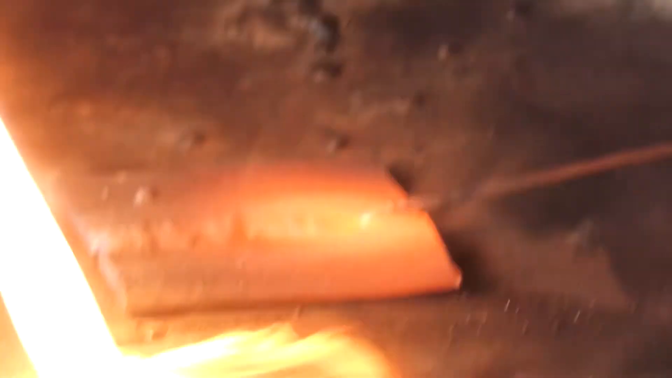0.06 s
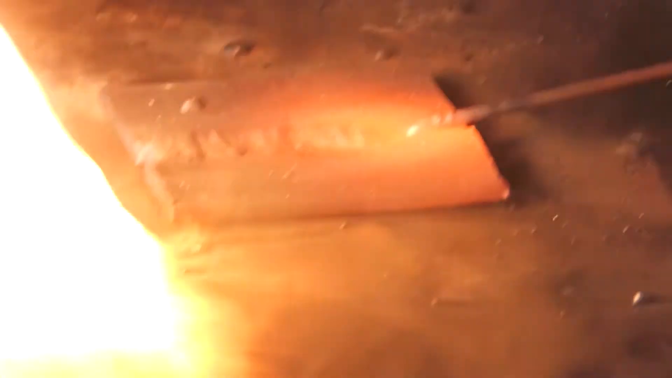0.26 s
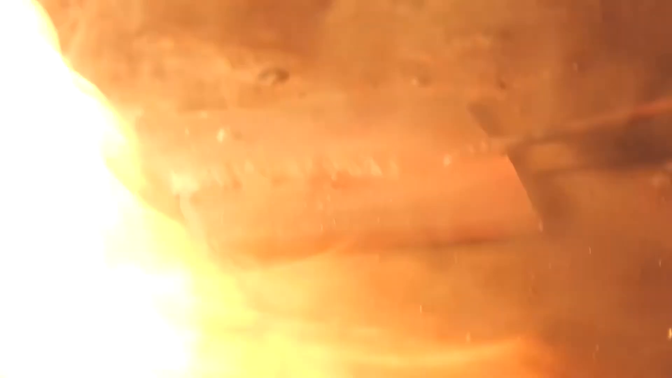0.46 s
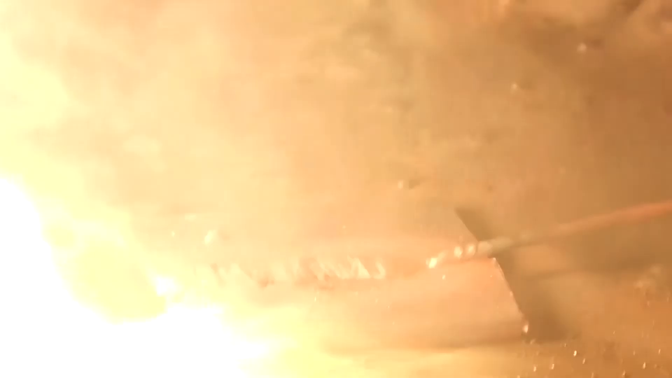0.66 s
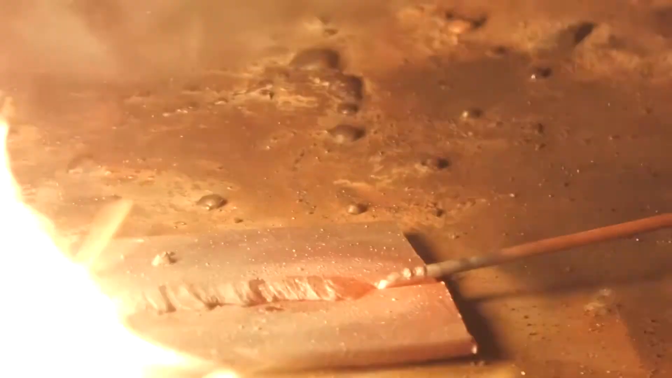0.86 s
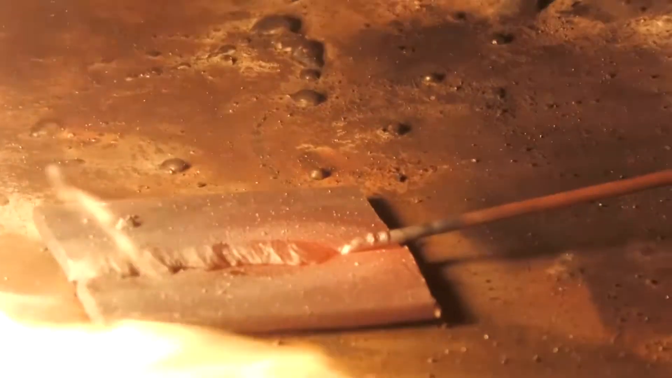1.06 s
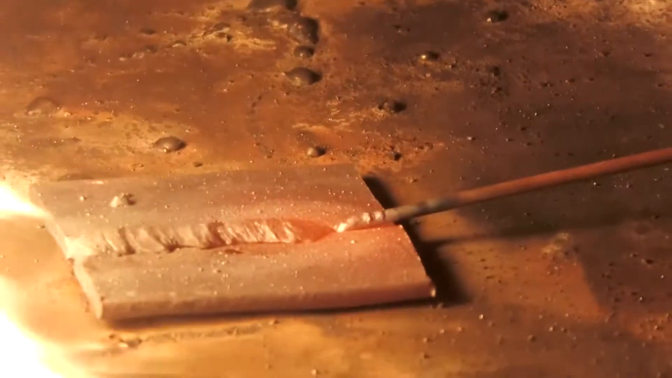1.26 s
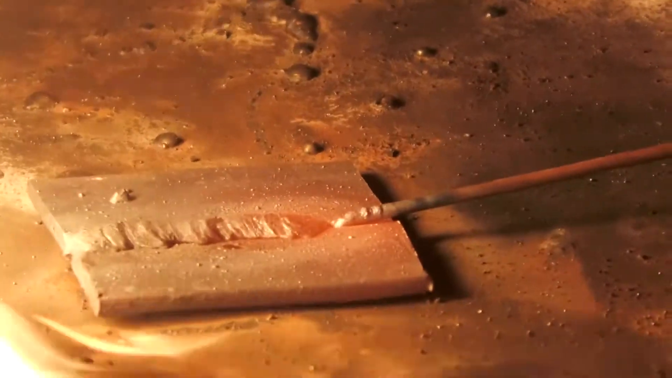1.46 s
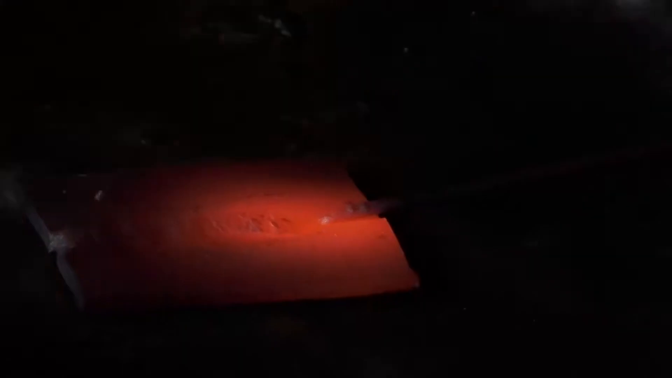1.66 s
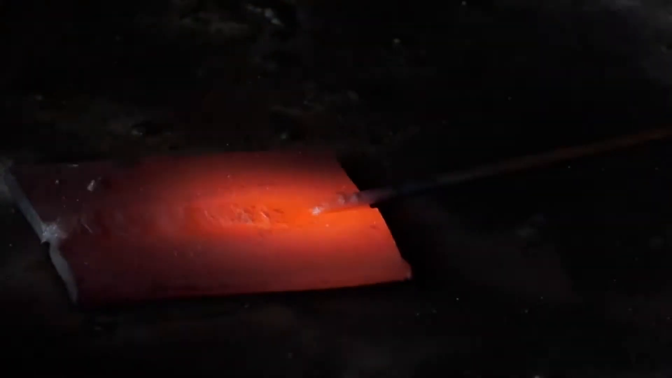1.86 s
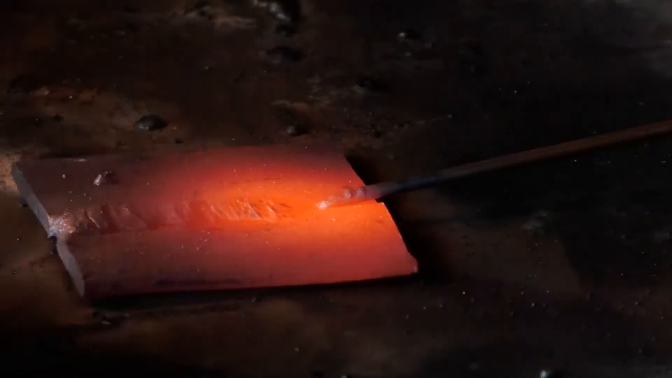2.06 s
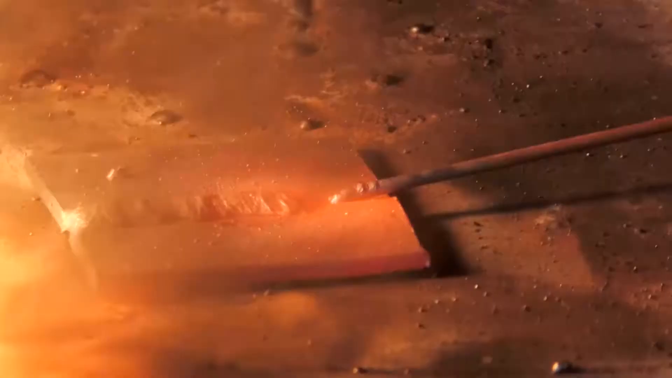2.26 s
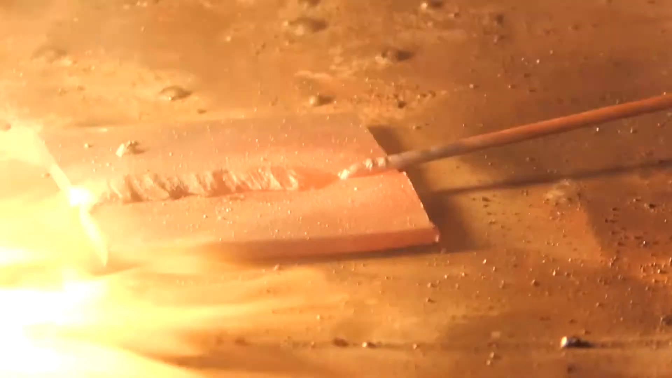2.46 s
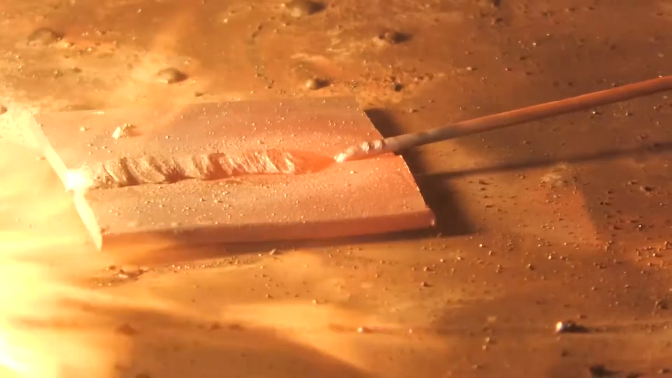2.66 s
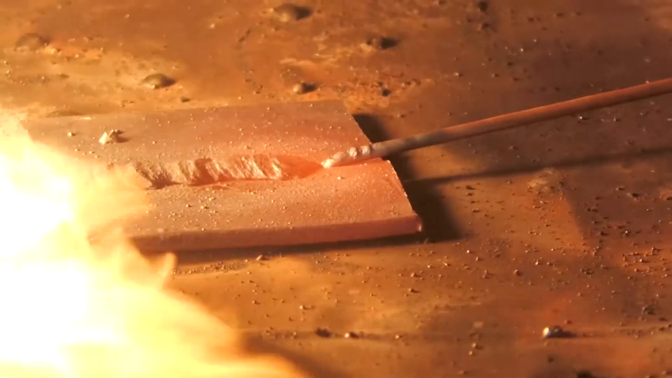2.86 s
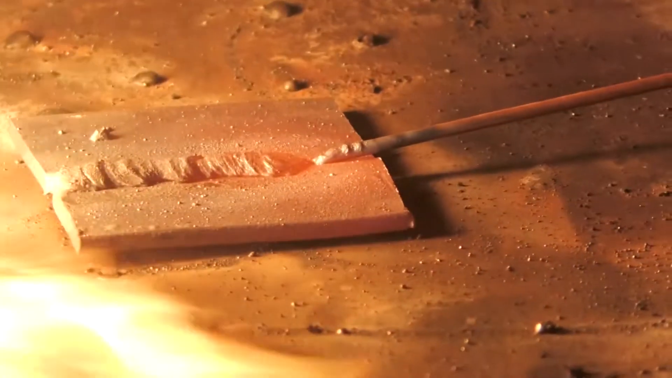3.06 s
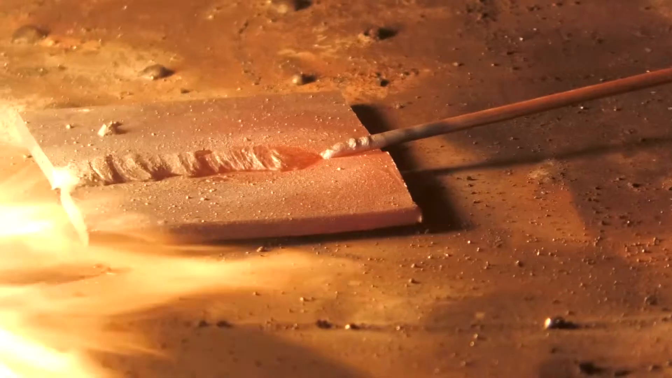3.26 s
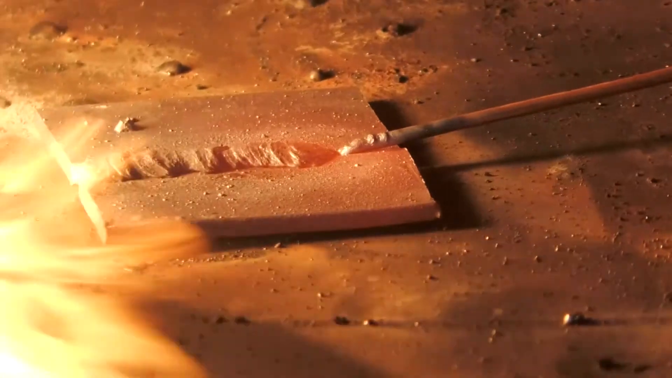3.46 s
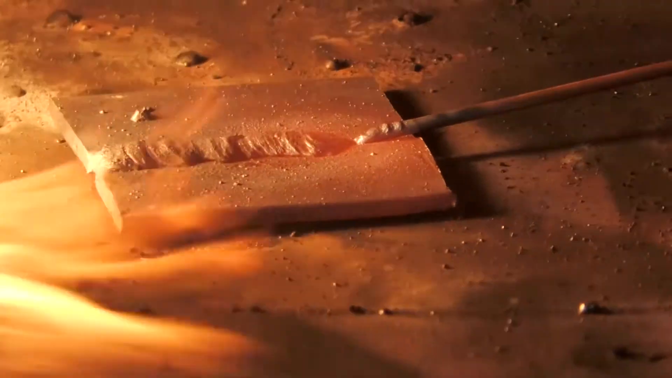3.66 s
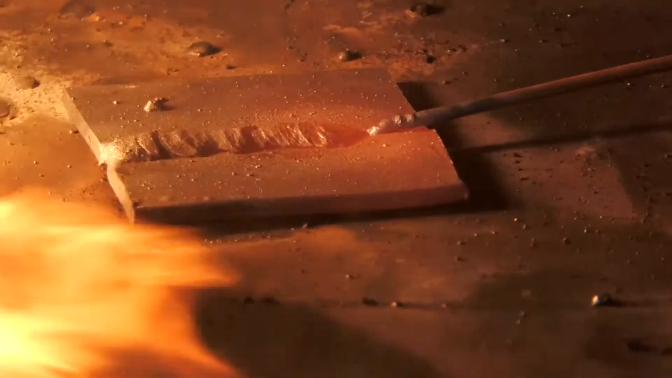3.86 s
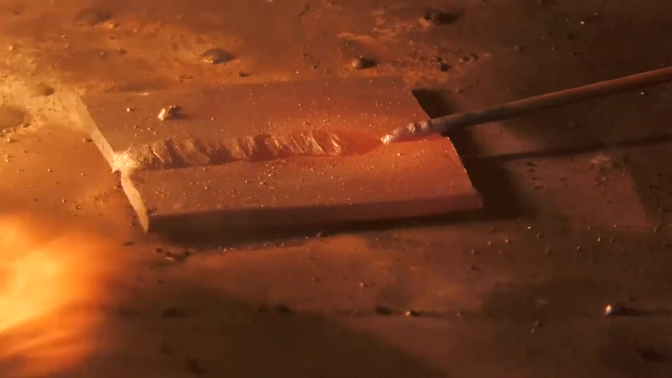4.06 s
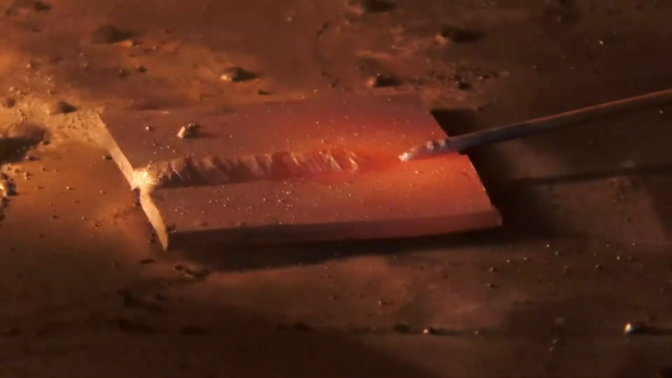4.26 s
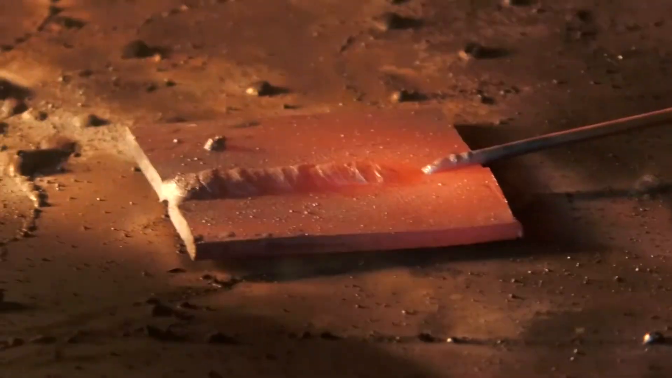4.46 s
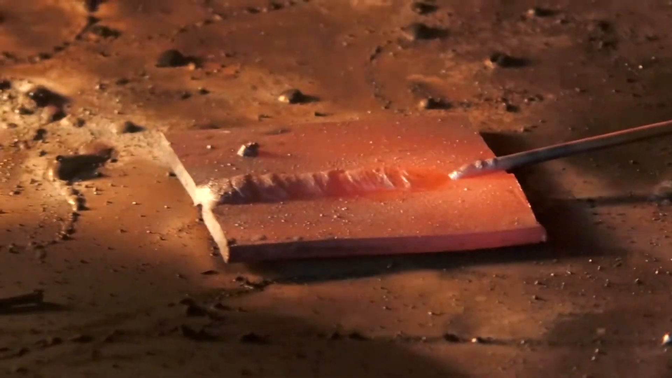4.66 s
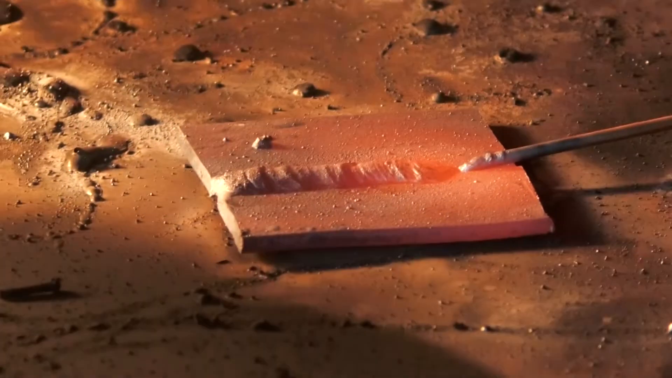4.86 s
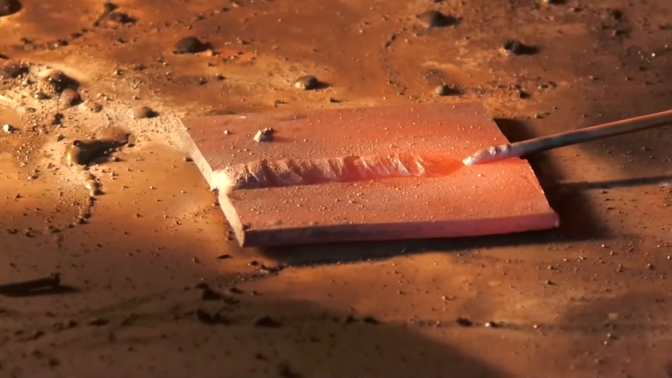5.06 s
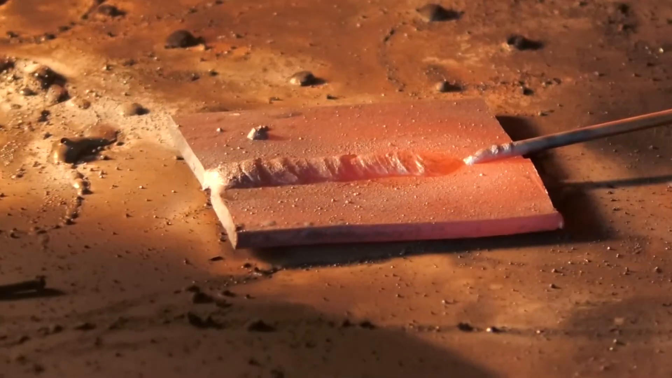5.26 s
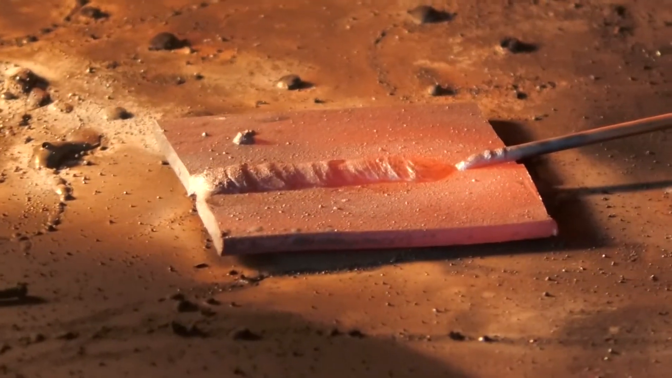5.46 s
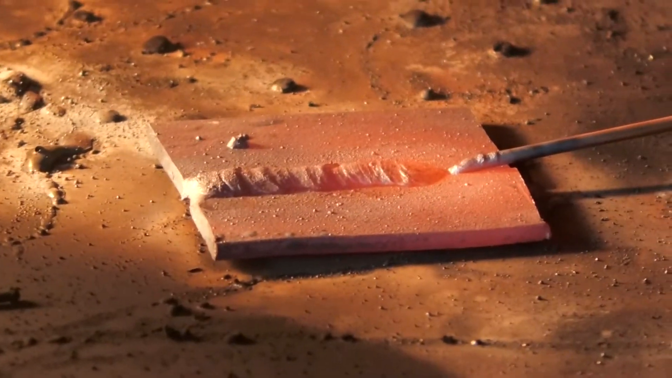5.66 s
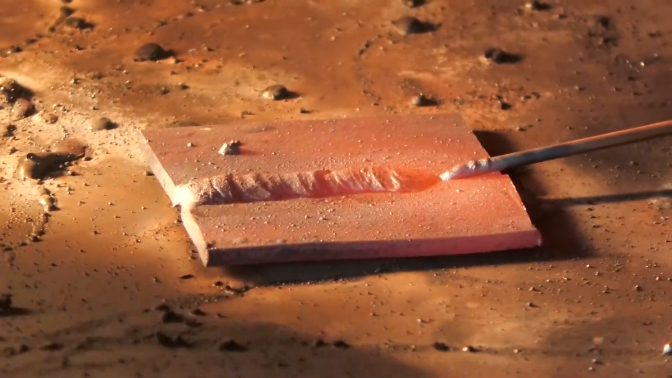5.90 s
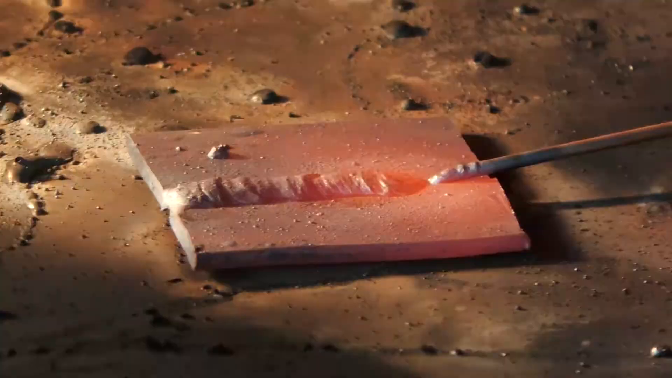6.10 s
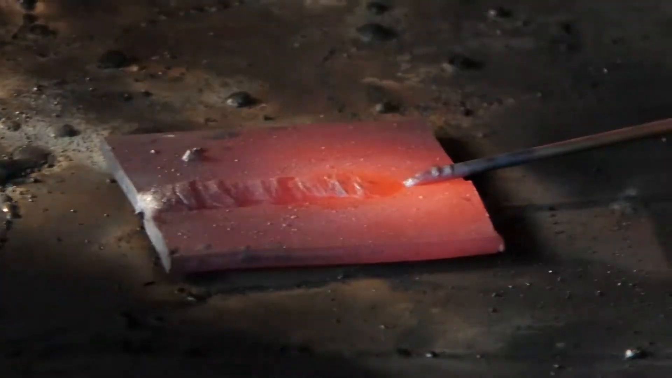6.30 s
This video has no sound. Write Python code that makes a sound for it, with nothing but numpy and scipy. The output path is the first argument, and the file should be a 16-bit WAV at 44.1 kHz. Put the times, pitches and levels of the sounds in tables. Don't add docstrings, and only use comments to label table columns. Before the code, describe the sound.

Close up in a workshop, a gas torch bursts into a loud, slightly distorted roaring hiss, holds for about a second, cuts off, and bursts on again. Low flame flutter weakens while the bright nozzle noise continues, dips, and flares briefly. Finally the flame is trimmed to a steady, thin, high hiss, pushing a little louder at the end. Short dry reflections, almost no background.

```python
import sys
import numpy as np
from scipy import signal
from scipy.fft import rfft, irfft, next_fast_len
from scipy.io import wavfile
from scipy.ndimage import uniform_filter1d

SR = 44100
rng = np.random.default_rng(int(sys.argv[2]) if len(sys.argv) > 2 else 0)


def how_loud(loudness_db):
    steps = np.asarray(loudness_db, float) / 20
    return 10 ** steps


def generate_wav(signal):
    frames = np.transpose(np.atleast_2d(signal))
    scaled = np.clip(frames, -1, 1) * 32767
    pcm = np.round(scaled).astype(np.int16)
    wavfile.write(sys.argv[1], SR, pcm)


N = 279153
TICK = 64
SHUT_DB = -140.0
TRIM_S = 4.53
DIP_START_S, DIP_END_S = 3.6, 3.87
FLARE_FALL_DB_PER_S = 196

# (time [s], extra jet side level [dB], extra flame side level [dB])
WIDTH_DB = [
    (0, -2, 1),
    (3.4, -2.5, 0.5),
    (4.55, 0, 1.5),
    (4.75, -0.5, -2),
    (6.33, 1, -8),
]
# (time [s], level [dB])
FLAME_DB = [(0.4, -71), (0.48, -41.5), (0.58, -26.5), (0.69, -12.5), (0.9, -20.5), (1.47, -19),
            (1.63, -23.5), (1.92, -77), (2.28, -84), (2.38, -35), (2.46, -15), (2.7, -15), (2.9, -23.5),
            (4.1, -28), (4.53, -23), (4.62, -35), (5.1, -52.5), (6.33, -58.5)]


def ticks():
    return np.arange(N // TICK + 2) * TICK / SR


def per_sample(control):
    return np.interp(np.arange(N) / SR, ticks(), control)


def ramp(start_s, end_s):
    return np.clip((ticks() - start_s) / (end_s - start_s), 0, 1)


def in_time(tables):
    t = ticks()
    out = SHUT_DB
    for rows in tables:
        s, *columns = np.transpose(rows)
        outside_s = np.maximum(np.maximum(s[0] - t, t - s[-1]), 0)
        curves = np.array([np.interp(t, s, column) for column in columns])
        out = np.maximum(out, curves - 4000 * outside_s)
    return out


def bursts(rows, fall_db_per_s):
    s, peak_db = np.transpose(rows)[:, :, None]
    return np.max(peak_db - fall_db_per_s * abs(ticks() - s), axis=0)


def drift(rate_per_s):
    settle = 1000
    pole = np.exp(-2 * TICK * np.pi * rate_per_s / SR)
    noise = rng.standard_normal(N // TICK + 2 + settle)
    slow = signal.lfilter([1], [1, -2 * pole, pole * pole], noise)[settle:]
    return slow / slow.std()


def at_hz(points, hz):
    point_hz, point_db = np.transpose(points)
    return np.interp(np.log(hz), np.log(point_hz), point_db)


def workshop(size, shop_db):
    t60_s, gap_s = 0.16, 0.002
    t = np.arange(SR // 2) / SR
    tail = rng.standard_normal(len(t)) * how_loud(-60 * t / t60_s) * (t > gap_s)
    tail /= np.sqrt(np.sum(tail ** 2))
    return 1 + how_loud(shop_db) * rfft(tail, size)


def to_stereo(mid, side):
    left_db = 0.93
    return np.array([mid + side, mid - side]) * how_loud([[left_db / 2], [-left_db / 2]])


def turbulence(levels_db, colour, ranges_hz, edges_hz, shared_db, own_db, flicker_per_s, shop_db=-6, width_db=0):
    # (frequency [Hz], side over mid [dB])
    side_over_mid = [(60, -6), (95, -6.5), (150, -12.5), (240, -11.5), (380, -11.5), (600, -15.5),
                     (950, -11), (1500, -13), (2380, -11), (3770, -17.5), (5980, -20.5), (9470, -5),
                     (15000, -7)]
    faint_db, faint_span_db, faint_flicker = -48, 15, 1.55
    size = next_fast_len(N)
    hz = np.maximum(np.arange(size // 2 + 1) * SR / size, 1)
    noise = rfft(rng.standard_normal((2, size)))
    mid, side = noise * how_loud(at_hz(colour, hz)) * workshop(size, shop_db)
    both = np.array([mid, side * how_loud(at_hz(side_over_mid, hz))])

    range_power = [2 * np.sum(abs(mid[(hz >= low) & (hz < high)]) ** 2) / size ** 2
                   for low, high in ranges_hz]
    gains_db = levels_db - 10 * np.log10(range_power)[:, None]
    centres = np.log(np.prod(ranges_hz, axis=1)) / 2
    order = np.argsort(centres)
    rank = np.arange(len(order))

    out = np.zeros((2, N))
    gust = drift(flicker_per_s)
    for low, high in zip(edges_hz, edges_hz[1:]):
        place = np.interp(np.log(low * high) / 2, centres[order], rank)
        share = np.clip(1 - abs(place - rank), 0, 1)
        faintness = np.clip((faint_db - share @ levels_db[order]) / faint_span_db, 0, 1)
        chop = 1 + faint_flicker * faintness
        flicker_db = shared_db * gust + chop * own_db * drift(flicker_per_s)
        gain = how_loud(share @ gains_db[order] + flicker_db)
        in_band = (hz >= low) & (hz < high)
        out += per_sample(gain) * irfft(both * in_band, size)[:, :N]
    width = how_loud(np.zeros(len(gust)) + width_db)
    return to_stereo(out[0], out[1] * per_sample(width))


def gas_db():
    # (time [s], level [dB])
    valve = [(0.46, -68), (0.546, -34.5), (0.692, -8), (0.94, -11), (1.55, -9.5), (2.0, -34), (2.33, -71),
             (2.4, -33.5), (2.47, -10.5), (2.78, -10), (2.95, -12.5), (3.3, -10), (3.55, -11),
             (3.97, -18.5), (4.4, -17), (4.65, -14), (5.95, -13), (6.33, -13.5)]
    # (time [s], peak level [dB])
    surges = [
        (4.53, -11),
        (4.97, -12.5),
        (5.7, -12.5),
        (6.19, -8.5),
    ]
    flow = in_time([valve])[0] + 4.0 * nudged_open()
    before_trim = 1 - ramp(TRIM_S - .3, TRIM_S - .2)
    return np.maximum(flow, bursts(surges, fall_db_per_s=40.5) + SHUT_DB * before_trim)


def nudged_open():
    return ramp(6.01, 6.03)


def narrowed():
    return ramp(2.57, 3.34)


def with_gas(full_db, loss, narrowed_db=0, trimmed_db=0):
    rising_db_per_s, rising_ease = 60, 0.79
    fade_bend = 0.0091
    settle_s, creep_per_s = 0.05, 0.2
    over_db = gas_db() + 11
    rising = np.gradient(over_db, ticks()) > rising_db_per_s
    bend = np.where(rising, rising_ease - 1, -fade_bend * np.clip(over_db + 10, -70, 0))
    loss = loss + max(loss - 1, 0) * bend
    since_s = np.maximum(ticks() - TRIM_S, 0)
    trimmed = 0.84 * (1 - np.exp(-since_s / settle_s)) + creep_per_s * since_s
    below_db = uniform_filter1d(loss * np.clip(over_db, -70, 0), size=21)
    return full_db + np.maximum(over_db, 0) + below_db + narrowed_db * narrowed() + trimmed_db * trimmed


def at_rest(laws, faintest_db):
    fill_db = 4.5 * nudged_open()
    return np.maximum([with_gas(*law) + fill_db for law in laws], np.array(faintest_db)[:, None])


def workshop_floor():
    # (time [s], level [dB])
    floor_level = [
        (0, -70.5),
        (4.5, -67),
        (6.33, -71.5),
    ]
    # (frequency [Hz], density [dB per Hz])
    floor_colour = [(71, -50), (120, -13), (323, -5), (362, -14.5), (1730, -22.5), (1880, -15), (2440, -41),
                    (4140, -120)]
    return turbulence(in_time([floor_level]), floor_colour, [(120, 1900)], [120, 1880],
                      shared_db=2.0, own_db=1.0, flicker_per_s=5, shop_db=-17.5)


def leak():
    # (start level [dB], drift [dB/s])
    leak_drift = [
        (-45, -26),
        (-61.5, 0),
        (-58.5, 15),
        (-60, 5),
    ]
    # (frequency [Hz], density [dB per Hz])
    leak_colour = [(1110, -59), (1880, -24.5), (3360, -29), (4000, -7), (4610, -11.5), (4870, -1),
                   (5780, -5), (6460, -3.5), (7800, -4.5), (8300, -14), (9270, -12), (11500, -12.5),
                   (12300, -28), (16000, -56), (22000, -120)]
    # (low [Hz], high [Hz])
    leak_ranges = [(4800, 6200), (3800, 4800), (6200, 7700), (7700, 12300)]
    leak_edges = [1880, 3800, 4800, 6200, 7700, 12300]
    end_s = 0.53
    rows = [(s, *[db + rate * s for db, rate in leak_drift]) for s in (0, end_s)]
    return turbulence(in_time([rows]), leak_colour, leak_ranges, leak_edges,
                      shared_db=0.1, own_db=0.54, flicker_per_s=11)


def puffs():
    # (time [s], peak level [dB], frequency [Hz], length [s])
    puff_events = [(0.08, -64, 1060, 0.035), (0.133, -51, 256, 0.023), (0.32, -56, 389, 0.06),
                   (0.347, -54, 161, 0.044), (2.034, -63, 54, 0.06), (2.31, -50, 43, 0.047),
                   (3.926, -50.5, 174, 0.048), (3.99, -54, 75, 0.074), (4.129, -50, 114, 0.06),
                   (4.249, -43, 169, 0.04), (4.45, -45, 269, 0.069), (4.72, -41.5, 838, 0.057),
                   (4.936, -41, 632, 0.027), (5.083, -40, 567, 0.018), (5.23, -48, 171, 0.032),
                   (5.434, -65, 657, 0.064), (5.441, -55, 1060, 0.04), (5.587, -50, 533, 0.047),
                   (5.703, -48, 313, 0.042), (5.744, -45, 618, 0.033), (5.897, -50, 195, 0.037)]
    t, out = np.arange(N) / SR, np.zeros(N)
    waver_s = np.cumsum(1 + .025 * per_sample(drift(30))) / SR
    phases = rng.random(len(puff_events))
    for (s, level_db, hz, length_s), phase in zip(puff_events, phases):
        start = max(int((s - 2 * length_s) * SR), 0)
        near = slice(start, int((s + 2 * length_s) * SR))
        swell = np.exp(-2.8 * ((t[near] - s) / length_s) ** 2)
        tone = np.sin(2 * np.pi * (hz * waver_s[near] + phase))
        out[near] += how_loud(level_db + 2.0) * swell * tone
    return to_stereo(out / 2, 0) * how_loud([[-0.465], [0.465]]) * 1.0


def roar():
    # (time [s], peak level [dB])
    flares = [(0.74, -17), (1.35, -16.5), (3.02, -16.5), (3.11, -13.5), (3.23, -15), (3.36, -17.5),
              (3.48, -21.5), (3.62, -21), (3.75, -20), (3.85, -20), (4.18, -18.5), (4.29, -14),
              (4.48, -10.5), (6.054, -48.5)]
    # (time [s], peak level [dB])
    low_flares = [(1.14, -24), (1.62, -26.5), (3.5, -26.5), (4.07, -42), (4.39, -35), (4.52, -41)]
    # (time [s], peak level [dB])
    high_flares = [(0.68, -20), (1.49, -21), (2.96, -27.5), (3.24, -29.5), (3.46, -31), (3.69, -35),
                   (4.41, -40), (4.5, -44)]
    # (full-flow level [dB], loss [dB/dB], narrowed [dB], trimmed [dB])
    top_laws = [(-23, 1.84, -4.5, -28), (-23.5, 1.15, -5, -17)]
    # (full-flow level [dB], loss [dB/dB])
    roar_rest = [(-63.5, 0.65), (-61.5, 0.7), (-68.5, 0.6), (-64, 0.8), (-63, 0.75)]
    roar_faintest = [-77, -78, -83, -86, -89]
    # (frequency [Hz], density [dB per Hz])
    roar_colour = [(220, -39), (375, -14), (404, -8), (501, -3.5), (601, 1), (793, 0), (860, -2.5),
                   (997, -5), (1440, -4), (1690, -8.5), (1880, -4.5), (2440, -35), (4140, -120)]
    # (low [Hz], high [Hz])
    roar_ranges = [(500, 900), (375, 500), (940, 1150), (1250, 1500), (1500, 1880)]
    roar_edges = [375, 500, 640, 780, 940, 1150, 1290, 1450, 1650, 1880]
    body_db = in_time([FLAME_DB])[0]
    dip = ramp(DIP_START_S, DIP_END_S)
    skirt_db = body_db - 7.5 - 13 * narrowed() - 5 * dip
    above_db = body_db - 10.5 - 17.5 * dip
    loose_db = [np.maximum(body_db, bursts(flares, FLARE_FALL_DB_PER_S)),
                np.maximum(skirt_db, bursts(low_flares, FLARE_FALL_DB_PER_S)),
                np.maximum(above_db, bursts(high_flares, FLARE_FALL_DB_PER_S))]
    loose_db += [np.maximum(with_gas(*law), body_db - 21.5) for law in top_laws]
    levels_db = np.maximum(loose_db, at_rest(roar_rest, roar_faintest))
    return turbulence(levels_db, roar_colour, roar_ranges, roar_edges, shared_db=0.37, own_db=1.53,
                      flicker_per_s=15, shop_db=-9, width_db=in_time([WIDTH_DB])[1])


def flutter():
    # (time [s], peak level [dB])
    flap_events = [(0.6, -29), (0.7, -19.5), (0.84, -38), (1.2, -39.5), (1.36, -26), (1.6, -35),
                   (2.5, -31.5), (2.61, -20), (2.72, -23), (3.07, -37), (3.23, -33), (3.39, -34),
                   (3.55, -45.5), (3.65, -41.5), (3.8, -48), (4.25, -40), (5.226, -48), (5.91, -51)]
    # (time [s], peak level [dB])
    hum_events = [(0.49, -33.5), (0.72, -20), (0.96, -25), (1.36, -43.5), (1.54, -49.5), (2.4, -32),
                  (2.48, -20), (2.56, -27), (2.72, -29.5), (0.86, -37.5), (2.95, -36.5), (3.14, -45),
                  (3.24, -52), (4.19, -49), (4.47, -51), (5.91, -52)]
    under_roar = [-25, -33, -25, -37]
    # (full-flow level [dB], loss [dB/dB])
    flutter_rest = [(-66.5, 0.5), (-64.5, 0.5), (-65.5, 0.72), (-82, 0.05)]
    flutter_faintest = [-76, -84, -77, -79]
    # (frequency [Hz], density [dB per Hz])
    flutter_colour = [(26, -53), (45, -24), (81, -25), (102, -21), (136, 0), (156, 8), (200, -0.5),
                      (236, -11.5), (258, -0.5), (275, -0.5), (306, -6.5), (349, -8), (375, -3), (490, -33),
                      (830, -120)]
    # (low [Hz], high [Hz])
    flutter_ranges = [(120, 235), (235, 305), (305, 375), (45, 120)]
    flutter_edges = [45, 120, 235, 305, 375]
    flaps_db = bursts(flap_events, fall_db_per_s=169)
    hums_db = bursts(hum_events, fall_db_per_s=230)
    sudden_db = [flaps_db, hums_db, flaps_db - 16.5, flaps_db - 24]
    steady_db = in_time([FLAME_DB])[0] + np.array(under_roar)[:, None] - 11 * narrowed()
    levels_db = np.max([sudden_db, steady_db, at_rest(flutter_rest, flutter_faintest)], axis=0)
    return turbulence(levels_db, flutter_colour, flutter_ranges, flutter_edges, shared_db=-0.5, own_db=0.98,
                      flicker_per_s=5.4, width_db=in_time([WIDTH_DB])[1] - 1)


def jet():
    # (full-flow level [dB], loss [dB/dB], narrowed [dB], trimmed [dB])
    jet_laws = [(-21, 1.0, 0, -6.5), (-25, 1.37, 0, -0.5), (-28, 2, -1.5, 1)]
    # (time [s], extra level above 7 kHz [dB])
    sharper = [(0.7, 1.6), (1.55, 1.7), (3.54, 2.5), (4.52, 1.8), (4.87, 3.4), (5.17, 2.7), (5.72, 4.7),
               (5.88, 3), (6.165, 3.57)]
    # (frequency [Hz], density [dB per Hz])
    jet_colour = [(1110, -32), (1880, -1), (1970, -0.5), (2590, -1.5), (2990, 1), (3310, -1), (4940, -3),
                  (6360, -4.5), (7560, -12), (10000, -18.5), (12300, -26.5), (16000, -52), (22000, -120)]
    # (low [Hz], high [Hz])
    jet_ranges = [(2400, 6500), (1880, 2400), (7700, 9600), (9600, 12250)]
    jet_edges = [1880, 2400, 3150, 3800, 4800, 6200, 7700, 8600, 9600, 12250]
    core_db = gas_db()
    shut_db = np.minimum(core_db + 80, 0)
    levels_db = np.array([core_db] + [with_gas(*law) + shut_db for law in jet_laws])
    levels_db[2:] += np.maximum(bursts(sharper, fall_db_per_s=34.5), 0)
    return turbulence(levels_db, jet_colour, jet_ranges, jet_edges, shared_db=0.5, own_db=-0.5,
                      flicker_per_s=10.7, width_db=in_time([WIDTH_DB])[0])


def air():
    # (opens [s], shuts [s], level against usual [dB])
    air_open = [(0.62, 1.689, -1), (2.39, 3.87, -0.5), (4.335, 4.355, -9), (4.5, 4.98, -1),
                (5.08, 5.283, 1), (5.407, 5.435, -6), (5.475, 5.505, -5), (5.61, 5.72, -2),
                (5.821, 5.922, 0), (6.004, 6.33, -6)]
    # (frequency [Hz], density [dB per Hz])
    air_colour = [(7240, -33), (12300, 1), (15700, -17)]
    gate_db = in_time([[(opens, db), (shuts, db)] for opens, shuts, db in air_open])
    levels_db = with_gas(full_db=-39, loss=2.5, narrowed_db=-2, trimmed_db=-8) + gate_db
    return turbulence(levels_db, air_colour, [(12700, 22000)], [12250, 14000, 15800],
                      shared_db=0.5, own_db=2.0, flicker_per_s=12)


def scene():
    return workshop_floor() + leak() + puffs() + roar() + flutter() + jet() + air()


def band_limit(x):
    return signal.sosfilt(signal.butter(12, 15810, fs=SR, output="sos"), x)


def record(dry):
    overload = 0.97
    return band_limit(np.clip(dry, -overload, overload))


dry = scene()
out = record(dry)
generate_wav(out)
```